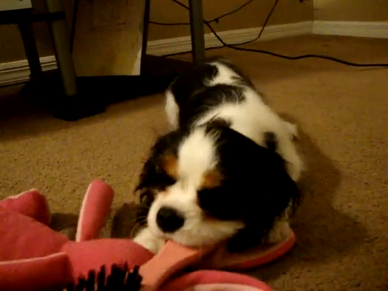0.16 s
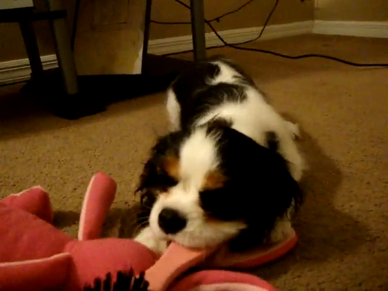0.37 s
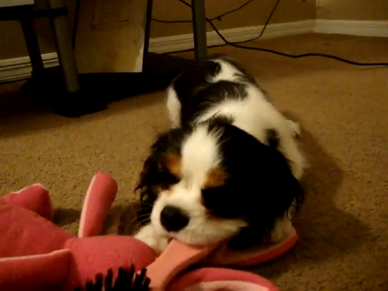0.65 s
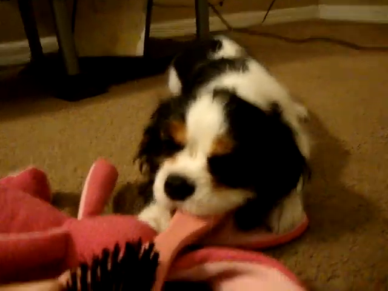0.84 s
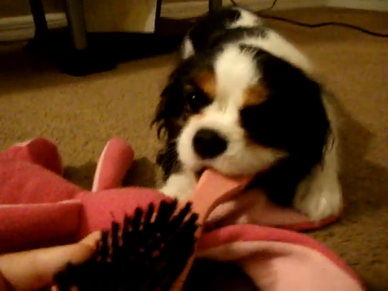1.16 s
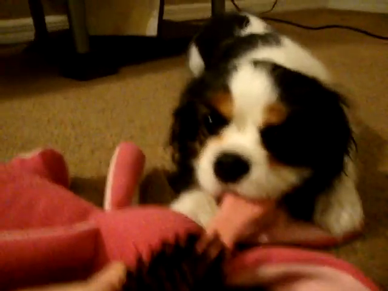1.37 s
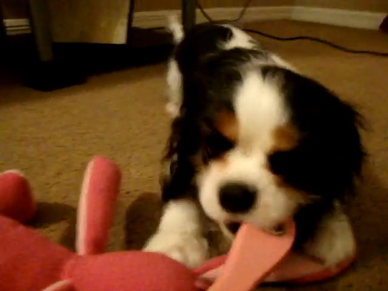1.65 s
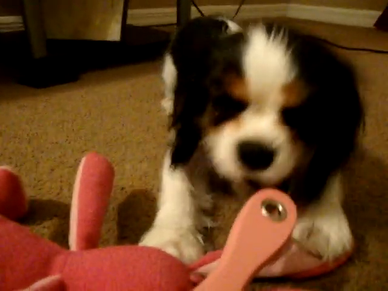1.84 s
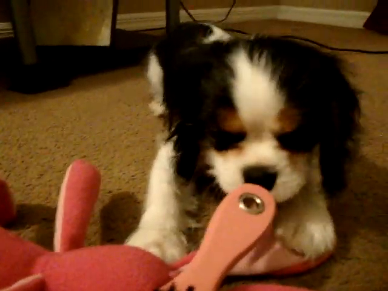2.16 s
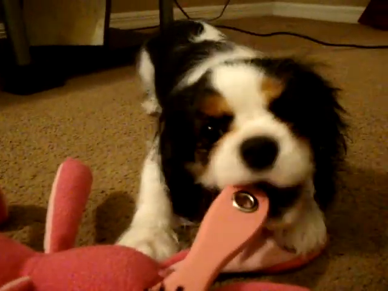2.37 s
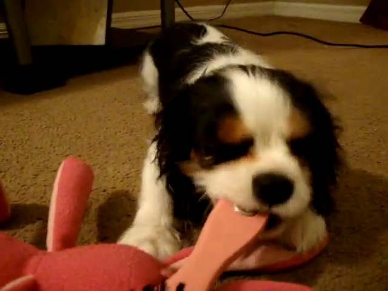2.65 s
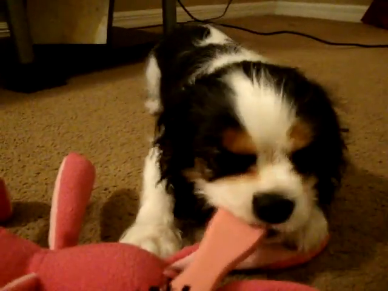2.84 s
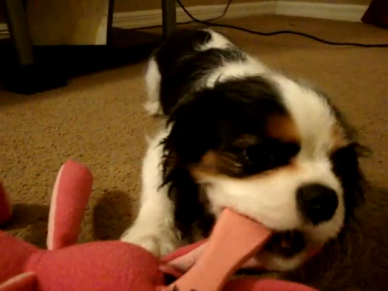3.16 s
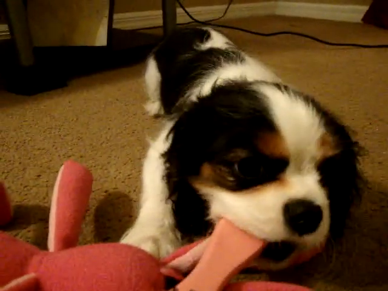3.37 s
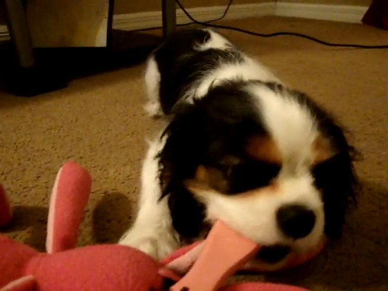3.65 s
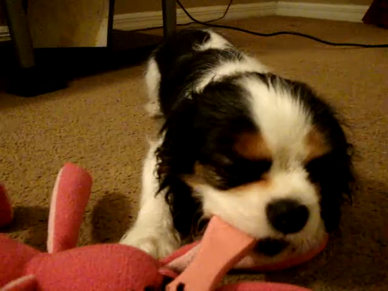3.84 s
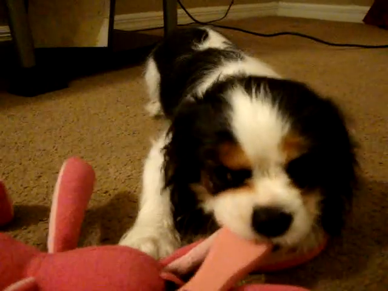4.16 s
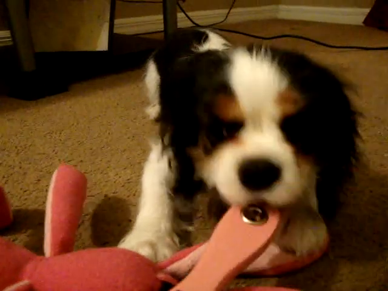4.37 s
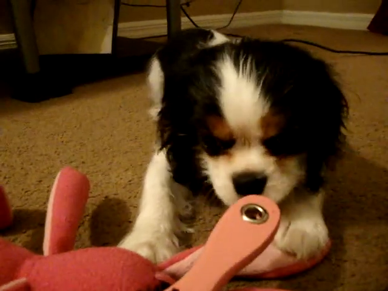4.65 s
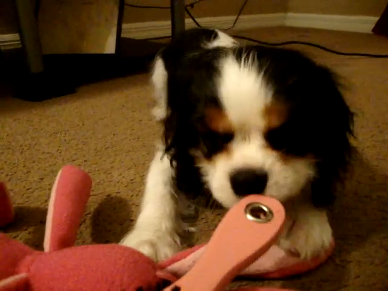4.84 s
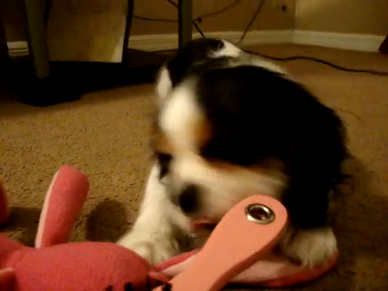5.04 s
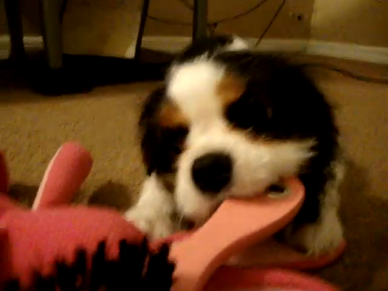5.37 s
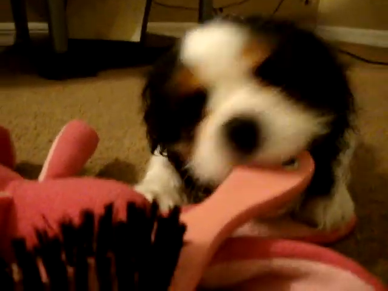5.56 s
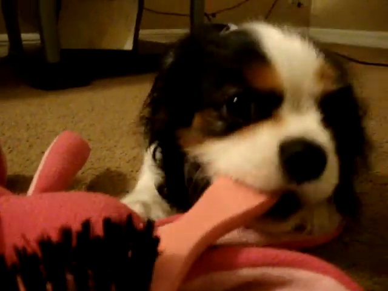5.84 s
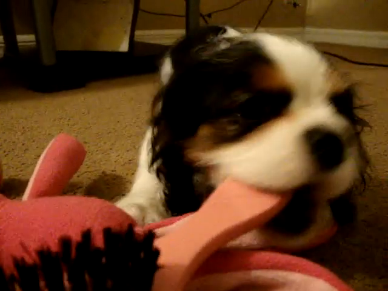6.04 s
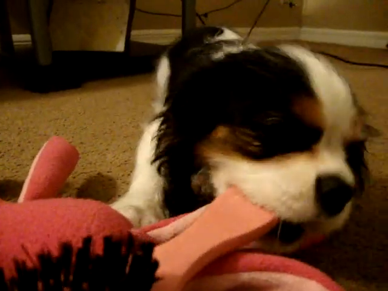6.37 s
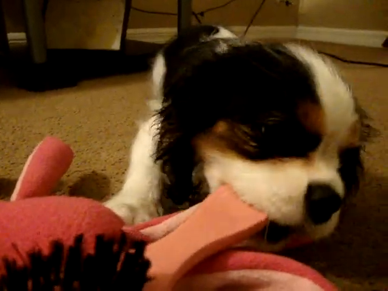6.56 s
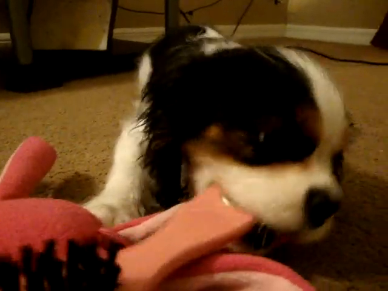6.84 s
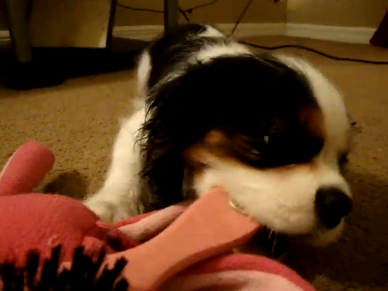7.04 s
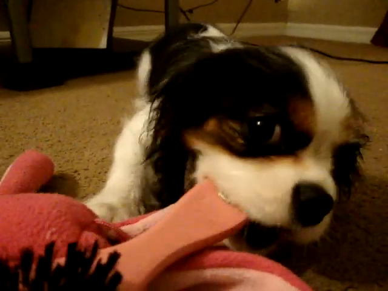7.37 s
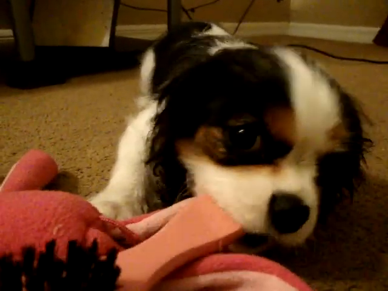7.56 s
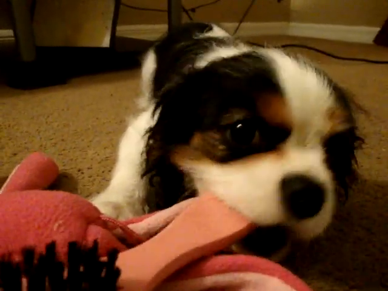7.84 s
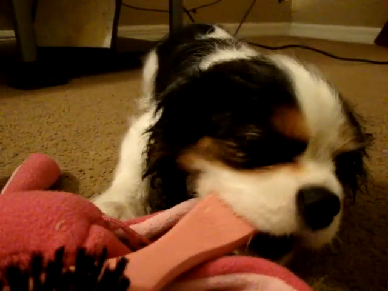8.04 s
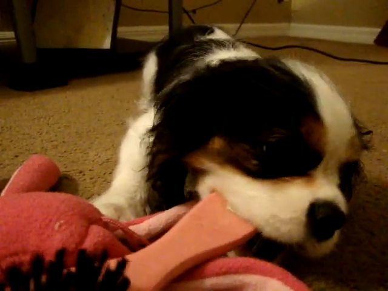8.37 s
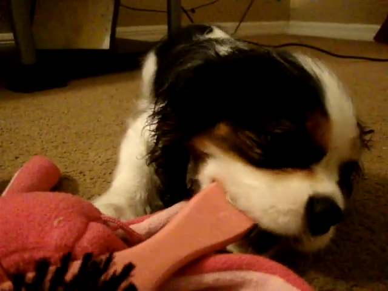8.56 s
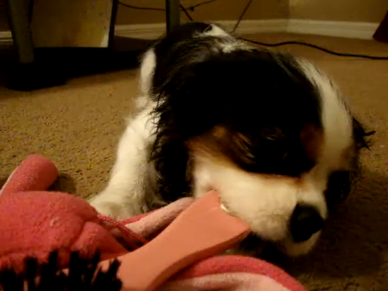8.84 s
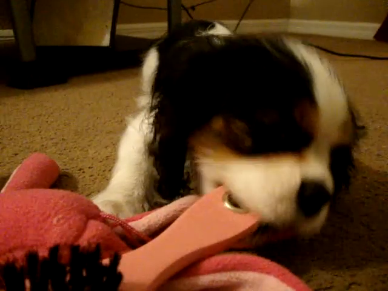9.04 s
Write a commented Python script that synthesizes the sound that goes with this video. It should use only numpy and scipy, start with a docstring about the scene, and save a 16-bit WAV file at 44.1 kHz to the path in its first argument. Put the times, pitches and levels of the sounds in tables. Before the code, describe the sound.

Close, uneven clicks and scrapes of a small dog's teeth on hard plastic, with a few wet mouth pops in a quiet room.

```python
"""Puppy gnawing a hairbrush

A puppy chews a plastic brush handle on a carpet, up close. Teeth knock and stick-slip on the
handle, which rings briefly, damped by the grip of jaws and hand. The wet mouth pops now and then
and a few dull low thumps sound, over a bed of room hum and microphone hiss."""
import sys
import numpy as np
from scipy import signal
from scipy.io import wavfile
from scipy.ndimage import uniform_filter1d

SR = 44100
rng = np.random.default_rng(int(sys.argv[2]) if len(sys.argv) > 2 else 0)


def wav_out(sig):
    """Save sig, one row per channel (or a flat mono array), as 16-bit PCM at SR to the path in sys.argv[1]."""
    wavfile.write(sys.argv[1], SR, np.round(np.clip(np.atleast_2d(sig).T, -1, 1) * 32767).astype(np.int16))


N = 406055


def tooth_knocks():
    """Each blow rings the handle's body, while its surface crackles on for a few milliseconds."""
    # (time [s], blow level [dB], middle modes re blow [dB], tick re blow [dB], ring t60 [s])
    knocks = [(0.765, -39.5, 3, -6, 0.0094), (1.4293, -19, -7, -2, 0.038),
              (1.4344, -21.5, -9.5, -15, 0.022), (1.564, -31, -25.5, -18, 0.04),
              (1.662, -29.5, -12.5, -23, 0.026), (1.671, -32.5, -11, -27, 0.028),
              (1.677, -30.5, -23, -12, 0.058), (2.489, -25.5, -23.5, -10, 0.037),
              (2.5725, -19.5, -19, -15, 0.022), (2.5766, -33, -2.5, -4, 0.02), (2.914, -33, -21, -9, 0.029),
              (2.965, -35.5, -19, 1.5, 0.048), (3.0111, -21.5, -27, -10.5, 0.043),
              (3.031, -35.5, -10.5, -30, 0.047), (3.0825, -19, -14.5, -11.5, 0.011),
              (3.115, -45.5, -3, 7, 0.026), (3.125, -45.5, 1.5, 2, 0.025), (3.187, -43.5, -5, -2, 0.02),
              (3.2904, -7.5, -19.5, -21.5, 0.031), (3.2945, -22, -5, -14.5, 0.015),
              (3.7342, -22, -21, -19.5, 0.0094), (4.0678, -9, -13.5, -15.5, 0.076),
              (4.0962, -24.5, -14, -13, 0.052), (5.22, -35.5, -26, -6, 0.035), (5.255, -52, -10, 8, .02),
              (5.27, -37, -22, -9, .041), (5.3173, -19.5, -22.5, -15.5, 0.023), (5.322, -36, -20, -1, .017),
              (5.689, -18, -21.5, -8.5, 0.05), (5.7142, -20, -15, -18.5, 0.034), (5.807, -42, 1, 0, 0.016),
              (5.819, -36.5, -8, -5, 0.022), (5.913, -30.5, -21, -34, 0.022), (5.927, -25, -17, -26, 0.025),
              (5.931, -19, -21.5, -10.5, 0.045), (5.965, -27.5, -31, -10.5, 0.042),
              (6.041, -28, -19, -28, 0.059), (6.1069, -27, -1.5, -2, 0.011), (6.1083, -13, -4, -8.5, 0.011),
              (6.249, -59, -9, 19, .035), (6.3857, -36, -10, -20, .012), (6.389, -34, -2, -13, 0.015),
              (6.406, -32, -10, -25, 0.014), (6.414, -28, -12, -13, 0.016), (6.435, -34, -16, -25, 0.017),
              (6.652, -39.5, -19, -5.5, 0.025), (6.692, -28, -18, -11.5, 0.023),
              (6.704, -29, -21, -6.5, 0.019), (6.8729, -18, -15.5, -11.5, 0.031),
              (6.89, -32, -14, -13, 0.029), (6.934, -33, -10.5, -10, 0.02),
              (7.5388, -22.5, -13.5, -16, 0.022), (7.5539, -31, -12, -30, 0.022),
              (7.5605, -35, -1, -30, 0.033), (7.5675, -12.5, -17, -29, 0.019),
              (7.5707, -32, -12, -32, 0.013), (7.6094, -24, -14, -20, 0.013), (7.656, -36, -6, -5, 0.022),
              (7.664, -41, -5, -2, 0.019), (7.814, -41, -20, -10, 0.053), (7.862, -39, -16, -4, 0.025),
              (7.8861, -20, -9, -23, 0.0096), (7.914, -38, -1.5, -0.5, 0.017), (8.056, -54, -7, 11, .02),
              (8.143, -25, 3.5, -10, 0.015), (8.76, -23, -22, -27, 0.01), (8.766, -26.5, -22, -24, 0.015)]
    out, t = np.zeros(N), np.arange(600) / SR
    scatters = rng.standard_normal((len(knocks), 7))
    shape = len(knocks), len(t)
    cracks = rng.standard_normal(shape) * (rng.random(shape) < 3000 / SR)  # 3000 a second
    for (start, db, middle_db, tick_db, t60), scatter, crack in zip(knocks, scatters, cracks):
        hold, upper_db = jaw_hold(start)
        upper_db += 0.82 * middle_db  # the upper modes largely follow the middle ones
        body, tick = handle_ring(hold, middle_db, upper_db, tick_db, t60, scatter, blow_db=db)
        force = (t == 0) + 0.59 * crack * np.exp(-t / 0.0018)
        crackle = signal.fftconvolve(force / np.linalg.norm(force), tick)[:len(body)]
        add(out, start, gain_of(db) * (body + crackle))
    return out


def tooth_scrapes():
    """Teeth drag in uneven stick-slip: many small slips of unlike size ring the handle."""
    # (start [s], length [s], level [dB], grip [0 loose to 1 tight])
    drags = [(1.421, .006, -45, .9), (1.423, 0.012, -28, 0.92), (1.446, 0.028, -45.5, 0.9),
             (1.466, 0.054, -55, 0.96), (1.52, 0.067, -51.5, 0.06), (1.626, 0.087, -50, 0.2),
             (2.586, .025, -57, 0.8), (2.906, 0.055, -49, 0.04), (3.25, 0.044, -50, 0.8),
             (3.311, 0.055, -52, 0.75), (4.052, 0.0079, -53, 0.2), (4.061, 0.006, -25, 0.45),
             (4.067, 0.068, -49, 0.5), (4.126, 0.033, -45.5, 0), (4.163, 0.042, -52.5, 0.1),
             (4.205, 0.06, -60, 0.1), (4.266, .01, -55, .05), (4.277, 0.057, -57, 0.4),
             (5.222, .04, -59, 0.3), (5.29, 0.021, -49, 0), (5.893, 0.046, -52.5, 0.5),
             (6.003, 0.016, -53, .05), (6.127, 0.054, -57, 1), (6.343, 0.0071, -48, 0.9),
             (6.348, 0.011, -39.5, 0.9), (6.356, 0.026, -47, 0.3), (6.38, 0.039, -52, 0.6),
             (6.634, 0.03, -58, 0.8), (6.683, 0.024, -44.5, 0.84), (6.864, .009, -51, 0.7),
             (6.872, 0.019, -41, 0.92), (7.533, 0.012, -44, 0.9), (7.548, 0.018, -42, 0.6),
             (7.602, 0.011, -52, .8), (7.648, 0.012, -46, 0.7), (7.789, 0.038, -51, 0.3),
             (7.862, 0.015, -49, 0.1), (8.136, 0.0069, -43.5, 0.9), (8.757, 0.033, -46.5, 0.78)]
    out, scatters = np.zeros(N), rng.standard_normal((len(drags), 6))
    slips = (rng.random(N) < 3000 / SR) * rng.choice([-1, 1], N)
    slips = slips * gain_of(3.5 * np.minimum(rng.exponential(1, N), 3.5))
    for (start, length, db, grip), scatter in zip(drags, scatters):
        hold, upper_offset_db = jaw_hold(start)
        # A tight grip makes the scrape brighter and shortens the ring.
        middle_db = np.interp(grip, (0, 1), (-23, -8))
        upper_db = np.interp(grip, (0, 1), (-18, -8.5)) + 0.5 * upper_offset_db
        tick_db = np.interp(grip, (0, 1), (-22, -13.5))
        t60 = np.interp(grip, (0, 1), (0.032, 0.0047))
        # A dragging tooth hardly damps the upper modes.
        body, tick = handle_ring(hold, middle_db, upper_db, tick_db, t60, scatter, min_upper_t60=0.02)
        train = slips[round(start * SR):][:round(length * SR)]
        train = train * signal.windows.tukey(len(train), 0.4)
        scrape = signal.fftconvolve(train, body + tick)
        rms = np.sqrt((scrape ** 2).sum() / len(train) + 1e-20)
        add(out, start, gain_of(db) * scrape / rms)
    return out


def handle_ring(hold, middle_db, upper_db, tick_db, t60, scatter, blow_db=-np.inf, min_upper_t60=0):
    """The plastic's answer to one tooth: a hollow body ring and a hard surface tick."""
    # Middle body modes: (pitch [Hz], level [dB], share of t60 [ratio])
    middle_modes = [(730, -2.5, 0.65), (1124, 6.5, 0.56), (1966, -1, 0.26)]
    # Upper body modes: (multiple of the upper pitch [ratio], level [dB], share of t60 [ratio])
    upper_ratios = [(1, 10, 0.7), (1.156, -11, 0.2)]
    # Surface modes: (pitch [Hz], level [dB], share of the tick's t60 [ratio])
    tick_modes = [(3890, 1, 0.068), (5580, 1.4, 0.11), (6480, 1.6, 0.1), (7600, 3.4, 0.11),
                  (9190, 0.48, 0.084)]
    bend_hz, hollow_hz, hollow_db, upper_hz, tip_db, tilt_db = hold
    bend_and_mouth = [(bend_hz, -2, 1), (hollow_hz, middle_db + hollow_db, 0.6)]
    upper_modes = [(ratio * upper_hz, db, share) for ratio, db, share in upper_ratios]
    body = damped_modes(bend_and_mouth, t60, detune=0.0068 * scatter[-2:])
    body += gain_of(middle_db) * damped_modes(middle_modes, t60, detune=0.043 * scatter)
    body += gain_of(upper_db) * damped_modes(upper_modes, max(t60, min_upper_t60), 0.003 * scatter)
    t = np.arange(len(body)) / SR
    # After a blow above -10 dB the ring holds about 5 ms, then dies away quickly.
    extra_fall_db_per_s = 510 * max(blow_db + 10, 0)
    body *= gain_of(-extra_fall_db_per_s * np.maximum(t - 0.0051, 0))
    surface = [(hz, db + tilt_db * np.log2(hz / 6000), share) for hz, db, share in tick_modes]
    tip = (5000, tip_db, 0.13)  # the short high mode of the handle's tip
    tick = gain_of(tick_db) * damped_modes(surface + [tip], t60=0.047, detune=0.025 * scatter)
    # The body takes up the force more slowly than the surface.
    body *= np.sin(np.pi / 2 * np.minimum(t / 0.00075, 1))
    tick *= np.minimum(t / 0.00043, 1)
    return body, tick


def jaw_hold(time):
    """How the handle sits in the jaws sets its tone colour and the upper modes' offset in dB."""
    # (time [s], bending pitch [Hz], mouth hollow [Hz], hollow level [dB], upper pitch [Hz],
    #  upper mode offset [dB], tip level [dB], tick tilt [dB/octave])
    holds = [(.76, 1040, 1400, 3, 2855, -22, 5, -10), (1.43, 956, 1630, 7, 2854, 0, 9.5, -17),
             (1.56, 1014, 1640, 13, 2870, -7, 2, -4), (1.67, 982, 1630, 4.5, 2840, -4.5, -3, 4),
             (2.49, 984, 1650, 10, 2790, -4, 1, 10), (2.575, 990, 1730, 11, 2740, -7, 8.5, -12),
             (2.94, 975, 1670, 5, 2870, -8, -8, -7), (3.01, 965, 1710, 9, 2880, -6.5, 3, -7.5),
             (3.09, 904, 1730, 6.5, 2820, -7, -1, -4), (3.29, 1004, 1310, 6, 2740, -5.5, 7.5, 10),
             (3.73, 990, 1400, 7, 2750, 8.5, 10.5, -15), (4.07, 1000, 1330, 6, 2846, -8, 7.5, -13),
             (4.097, 990, 1350, 6, 2855, -10, -10, 12), (4.16, 980, 1330, 6, 2855, -11, 8, 18),
             (4.3, 1000, 1330, 7, 2855, -2, 2, 8), (5.22, 970, 1390, 5, 2900, -21, -10, 3),
             (5.32, 960, 1390, 14.5, 2855, -26, -2, 4), (5.69, 970, 1630, 9, 2810, -11.5, -9, 5),
             (5.715, 968, 2040, 4.5, 2800, -8, 7, -1), (5.81, 990, 1500, 3, 2830, -7, -4, -2),
             (5.93, 960, 1290, 5, 2840, -16.5, -8, 0), (5.966, 986, 1330, 5, 2900, -20, -10, 3),
             (6.04, 978, 1660, 9, 2900, -8, 2, 3), (6.11, 1290, 1830, 5, 2800, -4.5, 0.5, -6.5),
             (6.35, 990, 1400, 0, 2820, -15, 7.5, -6), (6.41, 955, 1430, -4, 2840, -7.5, 4, -8),
             (6.7, 920, 1460, 3, 2780, -13, 4.5, -3), (6.87, 980, 1350, 8.5, 2780, -9.5, 2.5, 11),
             (7.54, 920, 1290, 3, 2730, -9, 5, -7), (7.57, 985, 1280, -2, 2790, -11.5, 4, -6),
             (7.63, 970, 1320, 3, 2800, -13, 4.5, 6), (7.82, 990, 1370, 10, 2855, -12, -4, 2),
             (7.865, 990, 1380, 3, 2800, -24, 0, 3), (7.89, 830, 1360, 2, 2740, -5, 3, -3),
             (8.14, 1000, 1380, 1, 2690, -13.5, 8, -2), (8.76, 930, 1210, -13, 2690, -14, 3, -1)]
    times, *columns = np.transpose(holds)
    hold = [np.interp(time, times, column) for column in columns]
    upper_offset_db = hold.pop(4)
    return hold, upper_offset_db


def damped_modes(modes, t60, detune):
    """Dying sines; each blow lands elsewhere and so detunes them a little."""
    t = np.arange(4000) / SR
    hz, db, share = np.transpose(modes)[:, :, None]
    decay = gain_of(db - 60 * t / np.maximum(share * t60, 1e-3))
    hz = hz * (1 + detune[:len(modes), None])
    return (decay * np.sin(2 * np.pi * hz * t)).sum(0)


def mouth_pops():
    """A small wet cavity snaps open: a rising blip and a duller click nearly an octave below."""
    # Tongue and lips: (time [s], level [dB], starting pitch [Hz], t60 [s])
    pops = [(3.7341, -25.5, 1340, 0.015), (5.1624, -29.5, 1760, 0.01), (6.2066, -19, 3570, 0.0039),
            (9.0222, -32.5, 3360, 0.0044)]
    out, t = np.zeros(N), np.arange(2000) / SR
    attack = np.minimum(t / 0.00032, 1)
    for start, db, hz, t60 in pops:
        phase = 2 * np.pi * hz * t * (1 + 15 * t)
        blip = np.sin(phase) + 0.38 * np.sin(0.55 * phase)
        add(out, start, attack * gain_of(db - 60 * t / t60) * blip)
    return out


def low_thumps():
    """Dull low thumps, mostly under hard bites, gone within a few cycles."""
    # (time [s], level [dB], pitch [Hz], t60 [s])
    thumps = [(1.065, -43.5, 172, 0.041), (1.079, -43, 215, 0.031), (1.43, -28.5, 200, 0.01),
              (4.068, -23, 366, 0.012), (5.934, -33, 110, 0.0092)]
    out, t = np.zeros(N), np.arange(4000) / SR
    for start, db, hz, t60 in thumps:
        add(out, start, gain_of(db - 60 * t / t60) * np.sin(2 * np.pi * hz * t))
    return highpass(out, hz=40, order=1)


def room_reverb(sound):
    """Sparse reflections of random sign, each band dying at its own speed."""
    # (frequency [Hz], t60 [s])
    decay_times = [(300, 0.36), (1000, 0.46), (3000, 0.12), (8000, 0.02)]
    reflections = np.zeros(SR // 2)
    slots = np.arange(300, SR // 2 - 20, 20)
    reflections[slots + rng.integers(0, 20, len(slots))] = rng.choice([-1., 1.], len(slots))
    hz, t, spectrum = signal.stft(reflections, SR, nperseg=256)
    decay = gain_of(-60 * t / curve_at(decay_times, hz)[:, None])
    tail = signal.istft(spectrum * decay, SR, nperseg=256)[1]
    return signal.fftconvolve(sound, tail / np.linalg.norm(tail))[:N]


def microphone_hiss():
    """Steady dark hiss whose bands flicker faintly."""
    # (frequency [Hz], relative density [dB])
    hiss_colour = [(12, -67), (20, -27), (70, -21), (112, -9), (199, -5.5), (233, -4.5), (266, -4),
                   (310, -1.5), (597, -4), (817, -4.5), (931, -6), (3000, -13.5), (8580, -19), (10300, -23)]
    frames, hz = N // 512 + 6, np.fft.rfftfreq(2048, 1 / SR)
    real, imag, flicker = rng.standard_normal((frames, len(hz), 3)).T
    flicker = uniform_filter1d(flicker, 20, axis=0)  # smooth across frequency, then time
    flicker = unit_rms(uniform_filter1d(flicker, 6, axis=1))
    spectrum = (real + 1j * imag) * gain_of(curve_at(hiss_colour, hz)[:, None] + 1.48 * flicker)
    hiss = signal.istft(spectrum, nperseg=2048, noverlap=1536)[1]
    return gain_of(-54) * unit_rms(hiss[:N])


def room_hum():
    """Low wavering tones, each a narrow band of noise."""
    # (pitch [Hz], bandwidth [Hz], level [dB])
    tones = [(238, 7.7, -67.5), (296, 1.4, -69), (411, 1.7, -76.5)]
    out, t = np.zeros(N), np.arange(N) / SR
    for hz, width, db in tones:
        pole = np.exp(-np.pi * width / SR)
        waver = signal.lfilter([1], [1, -pole], rng.standard_normal(N) + 1j * rng.standard_normal(N))
        out += gain_of(db) * unit_rms((waver * np.exp(2j * np.pi * hz * t)).real)
    return out


def gain_of(db):
    """Decibels to amplitude."""
    return 10 ** (np.asarray(db) / 20)


def unit_rms(x):
    """Scales to rms 1."""
    return x / np.sqrt(np.mean(x ** 2) + 1e-20)


def curve_at(points, hz):
    """Reads a curve on a log-frequency axis."""
    point_hz, values = np.transpose(points)
    return np.interp(np.log(hz + 1), np.log(point_hz + 1), values)


def highpass(sound, hz, order):
    """Rolls off the low end."""
    return signal.sosfilt(signal.butter(order, hz, "highpass", fs=SR, output="sos"), sound)


def add(mix, start, sound):
    """Mixes a sound in at a start time in seconds."""
    part = mix[round(start * SR):][:len(sound)]
    part += sound[:len(part)]


def scene():
    """Close chewing with a touch of room, low thumps and the noise bed, in mono."""
    chewing = tooth_knocks() + tooth_scrapes() + mouth_pops()
    chewing = highpass(chewing, hz=500, order=3)  # a thin handle radiates no bass
    reverb = gain_of(-31) * room_reverb(chewing)
    return (chewing + reverb + low_thumps() + microphone_hiss() + room_hum())[None]


def record(dry):
    """A steep treble cut and a faint floor of converter noise."""
    lowpass = signal.firwin(1023, cutoff=10130, window=("kaiser", 9), fs=SR)
    limited = signal.oaconvolve(dry, lowpass[None], "same")
    return limited + gain_of(-101.5) * rng.standard_normal(dry.shape)


dry = scene()
out = record(dry)
wav_out(out)
```